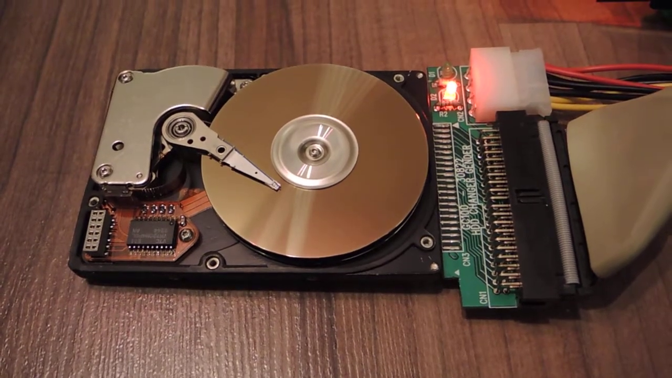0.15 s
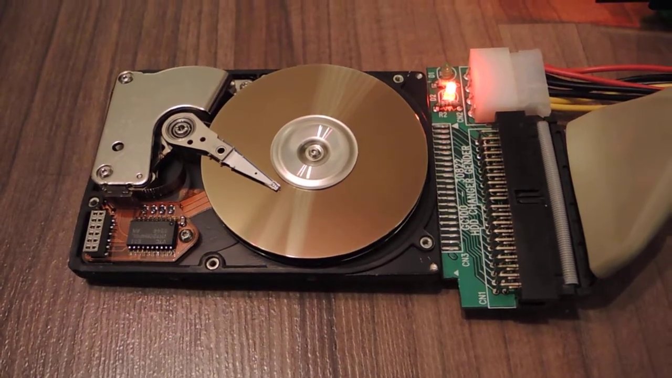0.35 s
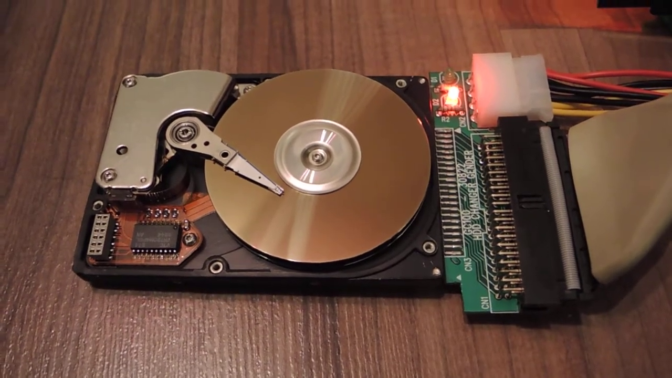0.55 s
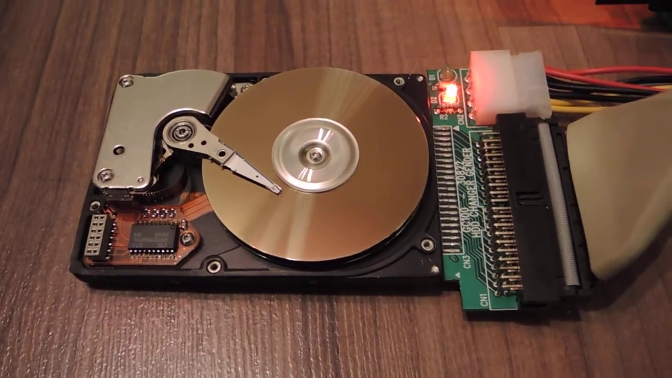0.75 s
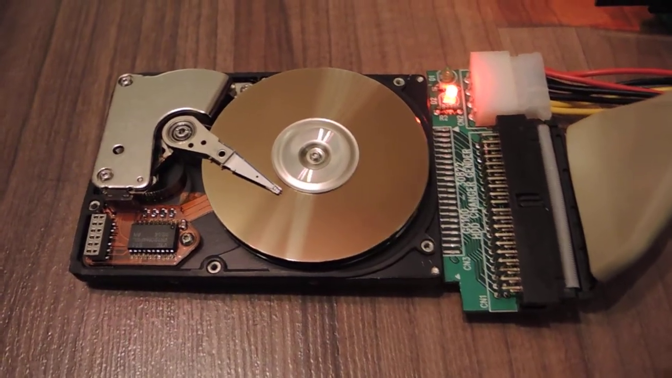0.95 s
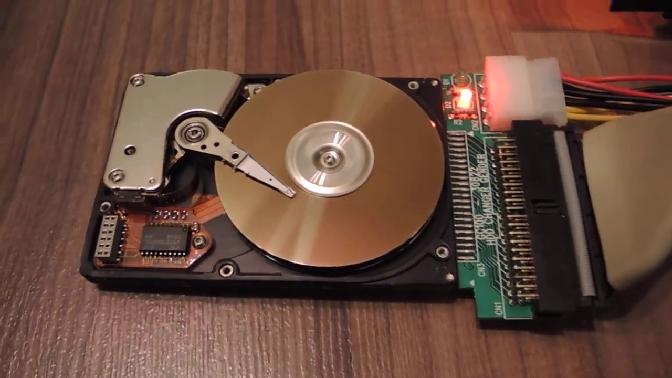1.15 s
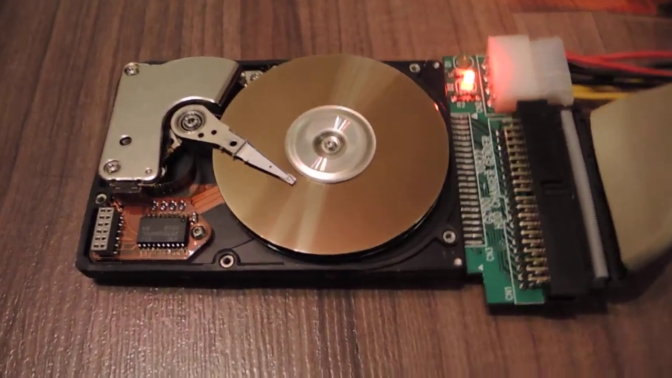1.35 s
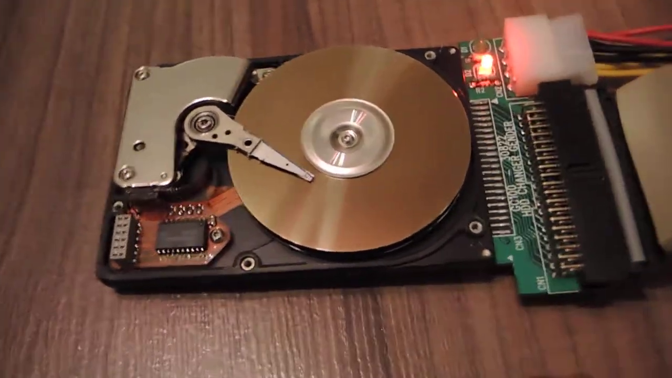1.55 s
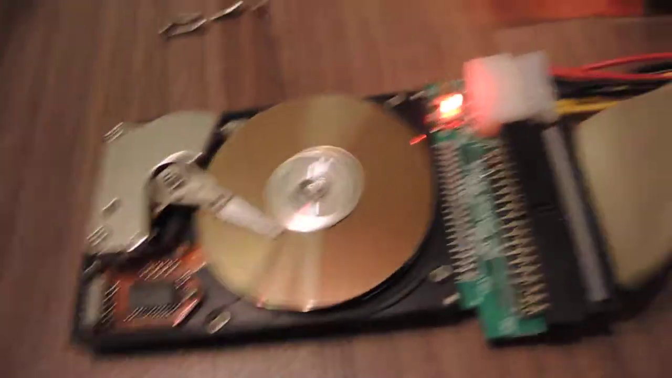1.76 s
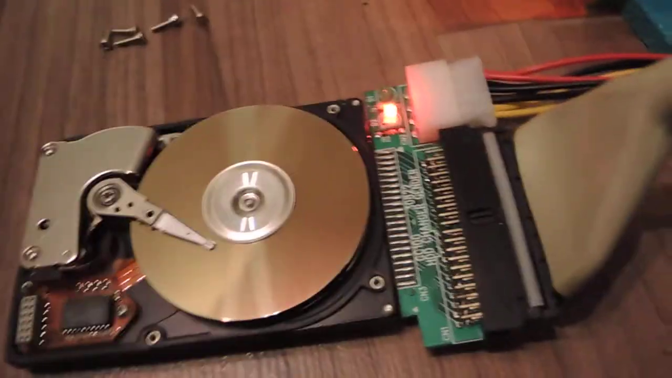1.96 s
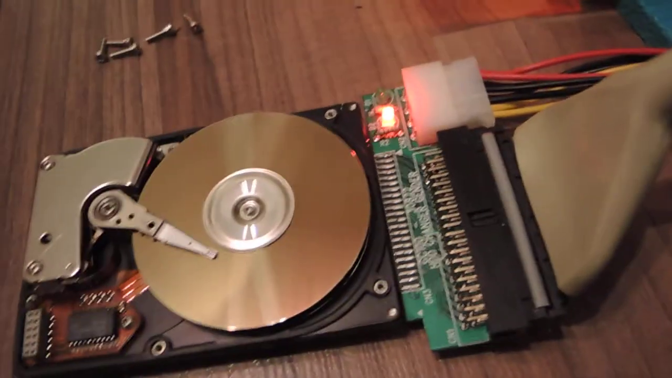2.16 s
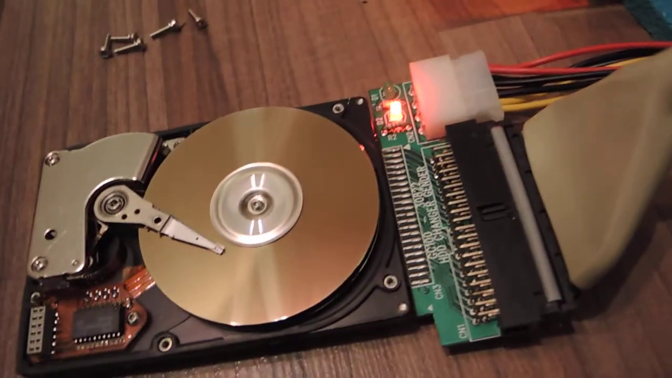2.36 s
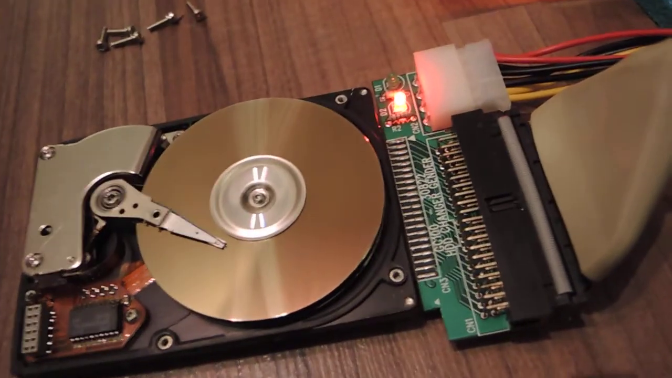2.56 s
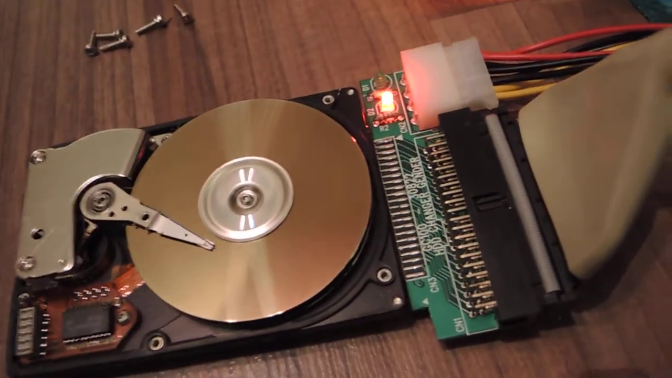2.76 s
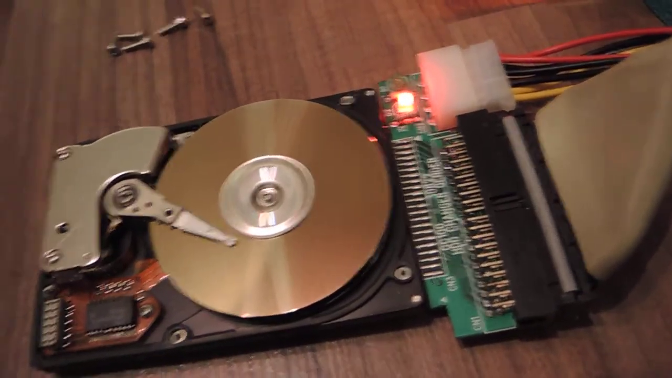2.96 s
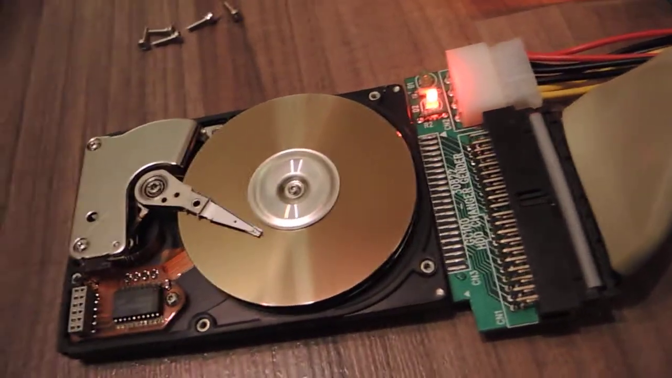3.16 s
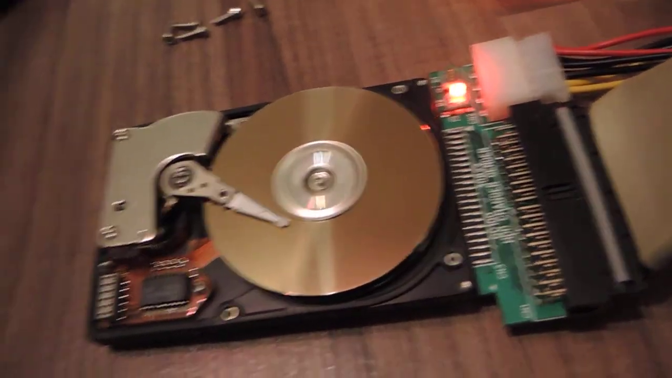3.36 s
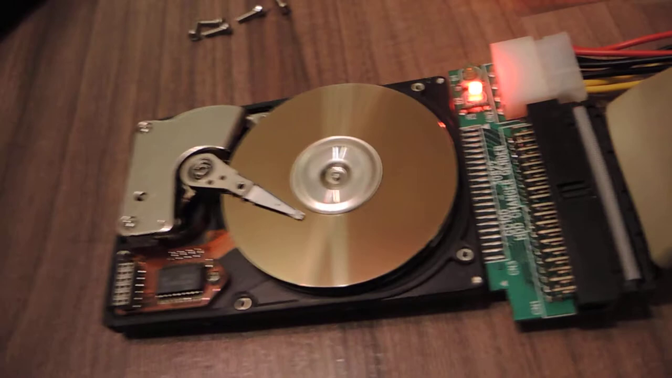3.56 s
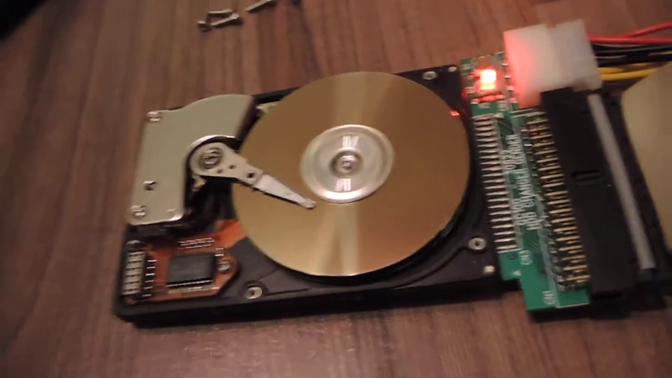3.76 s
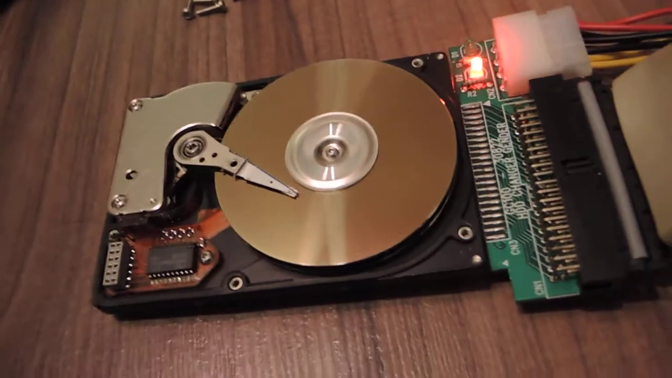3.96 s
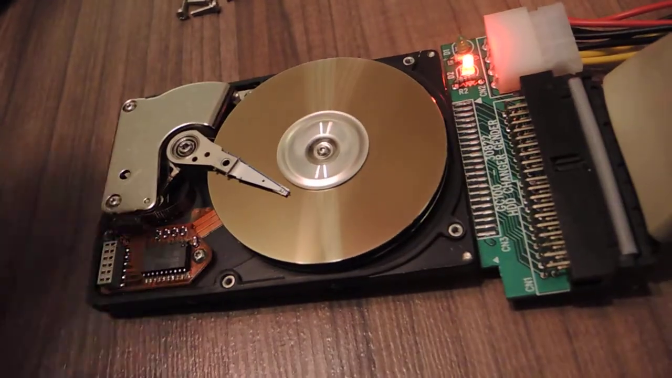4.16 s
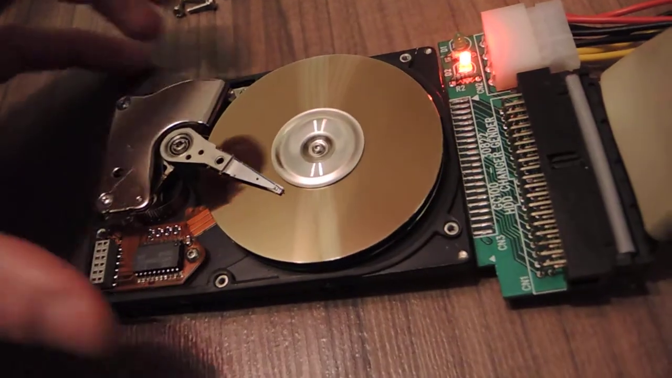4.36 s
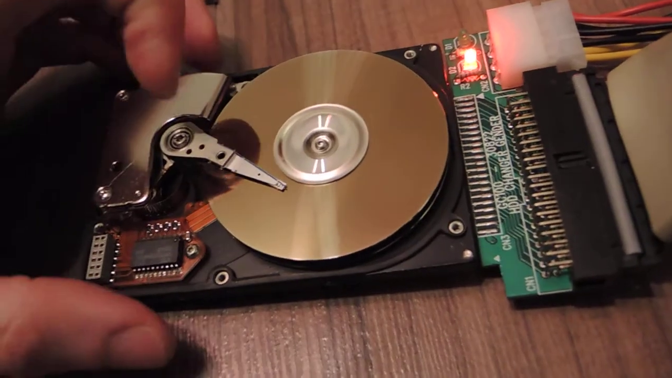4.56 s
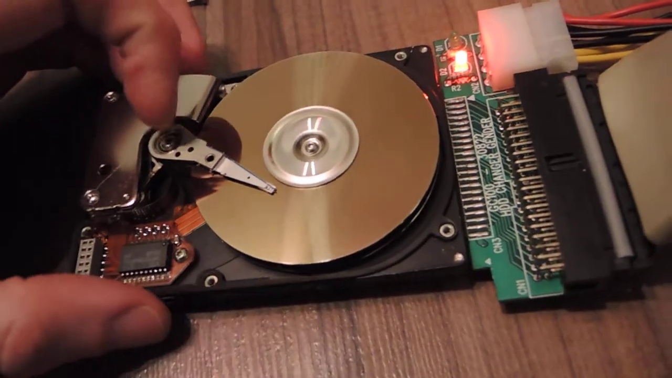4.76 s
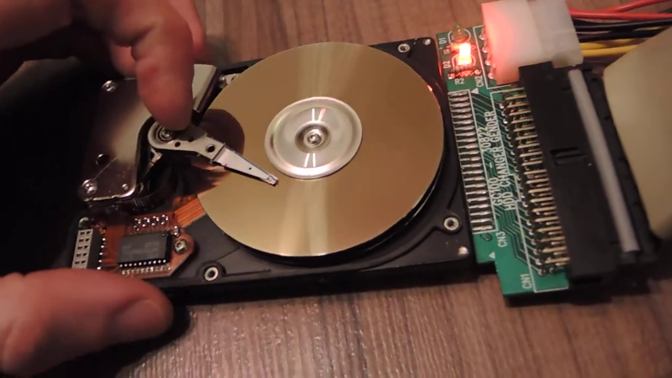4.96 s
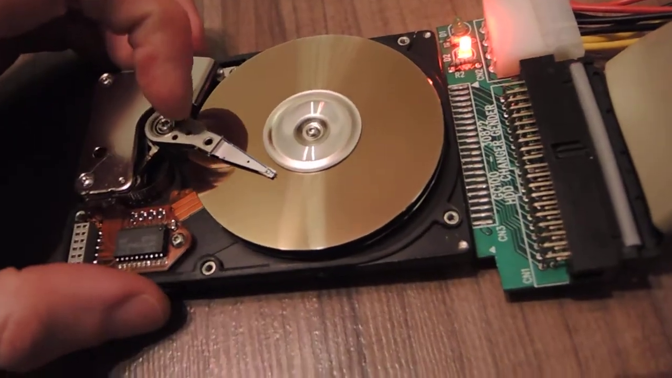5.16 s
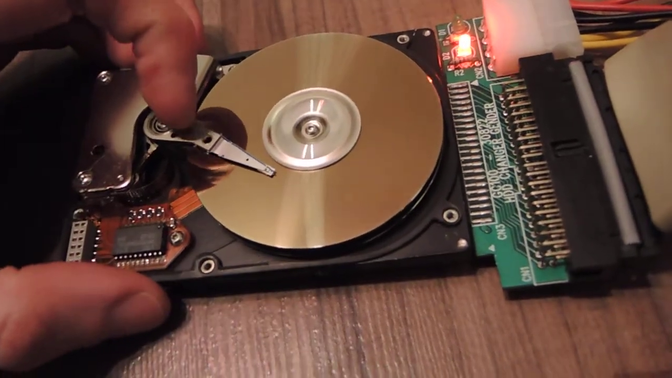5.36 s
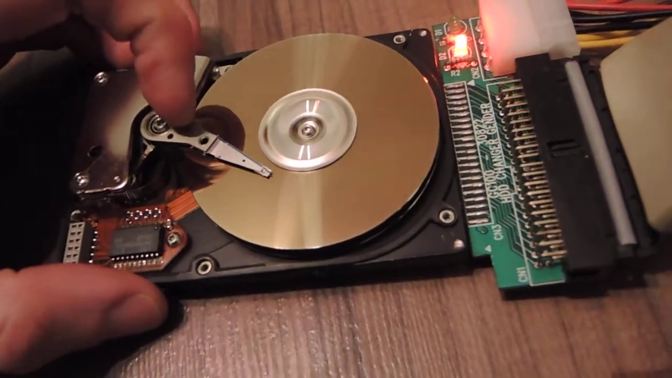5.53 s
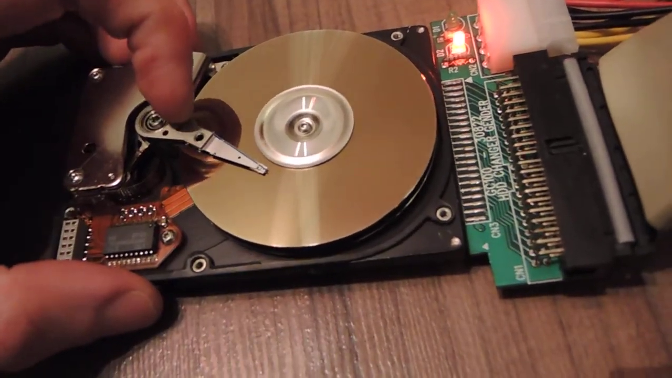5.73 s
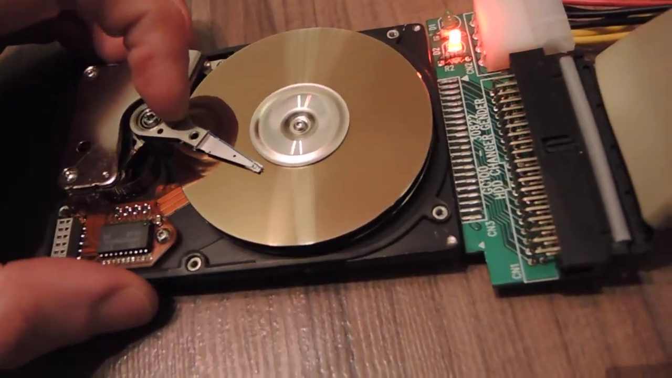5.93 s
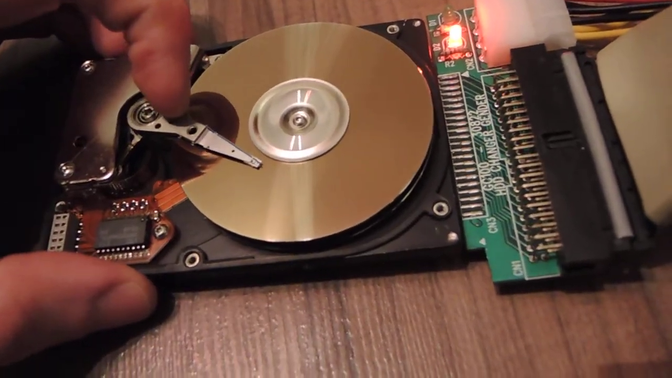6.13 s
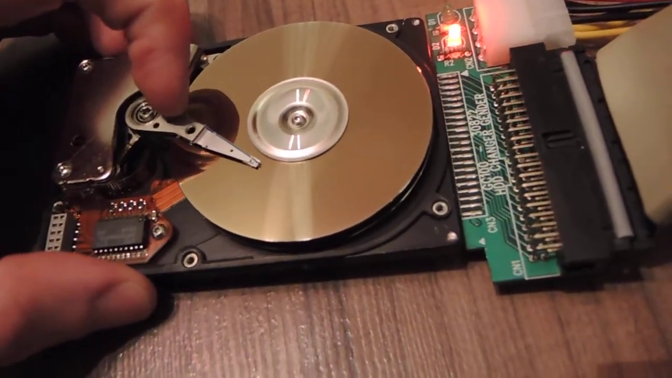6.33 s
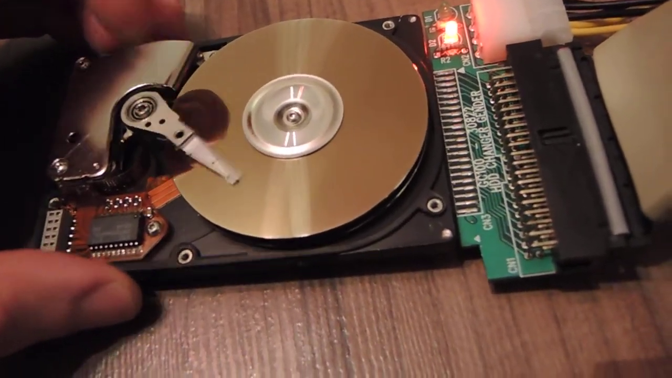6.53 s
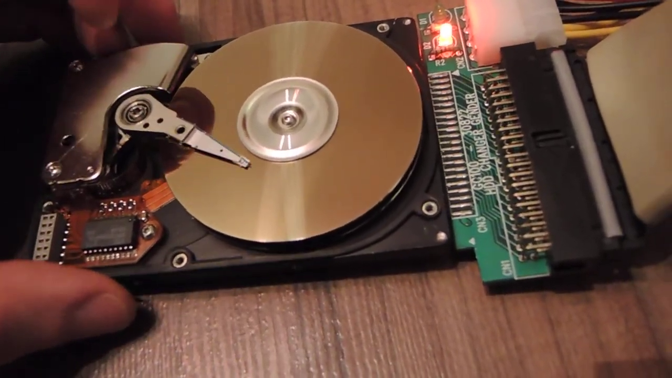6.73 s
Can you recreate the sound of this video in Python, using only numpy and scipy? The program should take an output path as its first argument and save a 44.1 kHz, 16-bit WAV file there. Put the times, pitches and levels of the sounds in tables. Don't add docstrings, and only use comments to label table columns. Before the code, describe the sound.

An opened hard drive spins on a wooden desk, heard very close in stereo in a small, quiet room. From 0 s there is steady airy hiss with faint whistling, thin fixed motor and bearing whines, a buzzing edge that dips around 0.6 s, and dull low room hum. Tiny case ticks come at 0.7 and 1.0 s. At 1.1 s the actuator starts a dry, bright chatter of paired ticks, thirty pairs a second, becoming less sharp, with small knocks at 1.6 and 2.15 s; it stops abruptly at 3.2 s. The buzz, which faded near 2 s, returns softly around 3.4 s. Clacks at 3.55 s and a harder, duller knock at 3.73 s follow, with low handling rumble. Steady spinning continues until 6.45 s, when the arm's latch releases in loud, crackling, slightly overloaded snaps, then metallic hits at 6.59 and 6.66 s and quick shrinking bounces until 6.7 s.

```python
import sys
import numpy as np
from scipy import signal
from scipy.fft import rfft, irfft, next_fast_len
from scipy.io import wavfile

SR = 44100
rng = np.random.default_rng(int(sys.argv[2]) if len(sys.argv) > 2 else 0)


def how_loud(loudness_db):
    steps = np.asarray(loudness_db, float) / 20
    return 10 ** steps


def materialize(psi):
    bounded = np.clip(np.atleast_2d(psi).T, -1, 1)
    quanta = np.round(bounded * 32767).astype(np.int16)
    wavfile.write(sys.argv[1], SR, quanta)


N = 299439

STEP_START_S, STEP_HZ, STEP_COUNT = 1.09175, 30.074, 65


def in_time(rows, s=None):
    at, *columns = np.transpose(rows)
    when = np.arange(N) / SR if s is None else s
    return [np.interp(when, at, column) for column in columns]


def at_hz(points, hz):
    table_hz, db = np.transpose(points)
    return np.interp(np.log(hz), np.log(np.maximum(table_hz, 1)), db)


def rms_one(x):
    return x / np.sqrt(np.mean(x ** 2) + 1e-20)


def drift(rate):
    r = np.exp(-80 * np.pi * rate / SR)
    slow = signal.lfilter([1], [1, -2 * r, r * r], rng.standard_normal(N // 40 + 2002))[2000:]
    return np.interp(np.arange(N) / 40, np.arange(len(slow)), rms_one(slow))


def ring(clicks, hz, t60):
    r, w = how_loud(-60 / (t60 * SR)), 2 * np.pi * hz / SR
    return signal.lfilter([0, np.sin(w)], [1, -2 * r * np.cos(w), r * r], clicks + 1e-18)


def body(x, peaks):
    out = 0
    for k, (hz, width, db) in enumerate(peaks):
        r = np.exp(-np.pi * width / SR)
        b = (1 - r * r) / 2 * np.array([1, 0, -1])
        a = [1, -2 * r * np.cos(2 * np.pi * hz / SR), r * r]
        out = out + (-1) ** k * how_loud(db) * signal.lfilter(b, a, x)
    return out


def pair(x, left_db=0, lead_s=.00002):
    size = next_fast_len(len(x))
    lag = np.exp(-2j * np.pi * np.fft.rfftfreq(size, 1 / SR) * lead_s)
    late = irfft(rfft(x, size) * lag, size)[:len(x)]
    return np.array([x * how_loud(left_db / 2), late * how_loud(-left_db / 2)])


def clicks_at(s, strength):
    out, at = np.zeros((1, N)), s[:, None] * SR
    near = np.round(at).astype(int) + np.arange(-8, 9)
    window = np.cos(np.pi * (near - at) / 17) ** 2
    np.add.at(out[0], near, strength[:, None] * np.sinc(near - at) * window)
    return out


def air_noise(spectrum, patchy_db, flicker):
    # frequency in Hz, left-right likeness from 0 to 1.
    likeness = [(60, 0.64), (130, 0.9), (290, 0.98), (630, 0.97), (1390, 0.89), (3060, 0.84), (6710, 0.57),
                (14700, 0.69)]
    # frequency in Hz, left minus right in dB.
    balance = [(60, 1), (110, -1), (200, -1.0), (380, -1.5), (690, -1), (1280, -0.5), (2350, -4.5),
               (4330, -0.5), (7990, 5), (14700, -4)]
    size = next_fast_len(N)
    hz = np.maximum(np.fft.rfftfreq(size, 1 / SR), 1)
    alike = np.clip(at_hz(likeness, hz), 0, 1)
    mid, side = rfft(rng.standard_normal((2, size))) * how_loud(at_hz(spectrum, hz))
    both = np.sqrt(1 + alike) * mid + np.sqrt(1 - alike) * side * [[1], [-1]]
    both = both * how_loud(at_hz(balance, hz) * [[.5], [-.5]])
    out, together = 0, drift(2.6)
    for centre in np.arange(np.log2(spectrum[0][0]), np.log2(spectrum[-1][0]), .5):
        share = np.clip(1 - 2 * abs(np.log2(hz) - centre), 0, 1)
        level_db = patchy_db * (0.31 * together + drift(flicker))
        out = out + irfft(both * share, size)[:, :N] * how_loud(level_db)
    return rms_one(out)


def turning(count):
    turn_hz, first, end = 62.09, 100, 232
    lines = np.zeros((count, 2049), complex)
    phase = 2 * np.pi * rng.random((count, end - first))
    lines[:, first:end] = how_loud(rng.normal(0, 4.9, end - first)) * np.exp(1j * phase)
    angle = (np.arange(N) / SR * turn_hz) % 1 * 4096
    turns = [np.interp(angle, np.arange(4096), turn, period=4096) for turn in irfft(lines)]
    return rms_one(np.array(turns))


def hiss():
    # frequency in Hz, hiss density in dB per Hz.
    hiss_spectrum = [(470, -14), (800, -7.5), (1320, -7), (1490, 2.5), (2010, 0.5), (2170, 1.5), (2360, 0),
                     (3840, 1.5), (4400, 3.5), (5220, -1.5), (6850, -5), (9530, -8.5), (12100, 0.5),
                     (15700, -60), (22000, -120)]
    # time in seconds, hiss level in dB.
    nearness = [(0, -34), (.3, -33.5), (.5, -36), (.66, -33.5), (1.6, -33), (3.2, -34), (3.45, -35),
                (6.79, -35)]
    hiss_db, = in_time(nearness)
    rush = how_loud(hiss_db - 3.0) * air_noise(hiss_spectrum, patchy_db=2.0, flicker=17.0)
    return rush + how_loud(hiss_db - 6.0) * whistles()


def whistles():
    # frequency in Hz, width in Hz, level in dB.
    cavities = [(928, 19, 15), (2700, 180, -11.5), (3480, 80, -24), (4600, 280, -1), (6850, 67, -10),
                (7720, 1380, 6), (11000, 370, 7.5), (11860, 175, 9)]
    shared, *apart = rng.standard_normal((3, N)) + how_loud(-5) * turning(count=3)
    wind = pair(shared) + .5 * np.array(apart)
    return rms_one(body(wind, cavities)) * how_loud(drift(0.91))


def tones():
    # frequency in Hz, rms level in dB.
    tone_lines = [(473.7, -50), (1077, -54), (1486, -52), (2156, -50), (2692, -52), (3305, -59), (3370, -52),
                  (3639, -52), (4011, -55), (4247, -57), (4307, -54), (4490, -52), (4721, -56), (5469, -61),
                  (5615, -61), (6735, -51), (7316, -57), (7860, -58), (8382, -59),
                  (7431, -59), (8985, -60), (10104, -62), (10691, -61), (11768, -59)]
    t, out = np.arange(N) / SR, 0
    for hz, db in tone_lines:
        phase = 2 * np.pi * (hz * t + rng.random()) + 0.42 * drift(1.5)
        apart = rng.normal(0, 0.46) * hz / 5000 * np.array([[1], [-1]])
        waver_db = 1.6 * drift(5.0)
        out = out + np.sqrt(2) * how_loud(db + 1.2 + waver_db) * np.sin(phase + apart)
    return out


def buzz():
    # time in seconds, buzz level in dB.
    motor_load = [(0, -38.5), (.4, -38.5), (.58, -49), (.75, -39.5), (1.15, -44), (1.5, -35), (1.65, -39),
                  (1.95, -68), (3.1, -60), (3.4, -45.5), (5.0, -45), (6.79, -44.5)]
    # frequency in Hz, width in Hz, level in dB.
    chassis = [(1450, 460, -11), (2480, 89, 1), (3410, 180, -6.5), (3967, 70, -2), (4520, 270, -3),
               (7436, 100, 2.5)]
    buzz_hz = 235.85
    pulses = np.zeros(N)
    at = np.arange(0, N - 1, SR / buzz_hz).astype(int)
    pulses[at] = how_loud(rng.normal(0, 0.34, len(at)))
    buzz_db, = in_time(motor_load)
    return pair(how_loud(buzz_db + 0.66 * drift(29.0)) * rms_one(body(pulses, chassis)), -0.54)


def sizzle():
    resting_db, stepping_db = -59, -75
    t = np.arange(N) / SR
    stepping = (t > STEP_START_S) & (t < STEP_START_S + STEP_COUNT / STEP_HZ)
    air = rng.standard_normal((2, N)) + .7 * turning(count=2)
    band = signal.sosfilt(signal.butter(4, (13500, 14150), "band", fs=SR, output="sos"), air)
    return how_loud(np.where(stepping, stepping_db, resting_db)) * rms_one(band)


def stepper():
    # time in seconds, level in dB.
    force = [(1.08, -17.5), (1.2, -17.5), (1.55, -15), (1.8, -15), (3.22, -16)]
    # frequency in Hz, level in dB, t60 in seconds,
    # left minus right in dB.
    housing = [
        [(8700, 5.5, .0032, 0), (7250, -7, .008, 1), (7900, -4, .004, 0), (6500, -14, .005, 1),
         (9500, -11, .002, 0), (13500, -22, .001, 0)],
        [(4150, -2, .010, -2), (4700, -6.5, .008, -1), (3650, -9, .008, -3), (3150, -12, .010, -4),
         (5250, -8, .006, 0), (5800, -11, .004, 0)],
        [(2570, -6, .016, -4), (930, -21, .03, 0), (1530, -20, .04, 0), (1440, -16, .075, -1),
         (1250, -25, .02, 0), (1750, -25, .02, 0)],
    ]
    arrivals_s, rises_s = (.00005, .0003, .0007), (.0001, .0002, .0008)
    return_s, echo_s, echo_db, jitter_s = .0095, .0019, -12.0, .000006
    steps = STEP_START_S + np.arange(STEP_COUNT) / STEP_HZ
    step_db, = in_time(force, steps)
    treble_db = np.maximum(7 - 7 * (steps - STEP_START_S), 0.5)
    treble_db[-1] = 5
    return_db = step_db + np.linspace(-8, -3.5, STEP_COUNT)
    s = np.r_[steps, steps[:-1] + return_s]
    db = np.r_[step_db, return_db[:-1]]
    s = s + rng.normal(0, jitter_s, len(s))
    pull = np.r_[np.ones(STEP_COUNT), -np.ones(STEP_COUNT - 1)]
    extra_db = np.r_[treble_db, treble_db[:-1] + 1.5], 0, 0
    out, t = 0, np.arange(int(.06 * SR)) / SR
    for modes, arrival, rise, more_db in zip(housing, arrivals_s, rises_s, extra_db):
        shape = 0
        for k, (hz, mode_db, t60, left_db) in enumerate(modes):
            fading_db = mode_db - 60 * t / t60 + np.array([[.5], [-.5]]) * left_db
            shape = shape + (-1) ** k * how_loud(fading_db) * np.sin(2 * np.pi * hz * t)
        strength = how_loud(db + more_db + rng.normal(0, .9, len(s))) * pull
        clicks = clicks_at(s + arrival, strength)
        clicks -= clicks_at(s + arrival + echo_s, how_loud(echo_db) * strength)
        out = out + signal.fftconvolve(clicks, shape * (1 - np.exp(-t / rise)), axes=1)[:, :N]
    return np.array([out[0], pair(out[1])[1]])


def blows(events, groups, gain_db, low_db, own):
    out, t = np.zeros((2, N)), np.arange(int(.15 * SR)) / SR
    for s, peak_db, treble_db, t60 in events:
        shared, *apart = rng.standard_normal((3, len(t)))
        rattle = (pair(shared) + own * np.array(apart)) * np.minimum(t / 0.0001, 1)
        sound = 0
        for peaks, db, share in zip(groups, (low_db, 0, treble_db), (1, 1, 0.78)):
            rung = body(rattle * how_loud(-60 * t / (t60 * share)), peaks)
            sound = sound + how_loud(db) * rung / abs(rung).max()
        at = round(s * SR)
        out[:, at:at + len(t)] += (how_loud(peak_db + gain_db) * sound / abs(sound).max())[:, :N - at]
    return out


def head_arm():
    # start in seconds, peak in dB, treble over middle in dB, t60 in seconds.
    snaps = [
        (6.4436, -9, 1, 0.024),
        (6.4536, 12.5, 13.4, 0.012),
        (6.4662, 7, 6.3, 0.014),
        (6.4728, -3, 9.7, 0.024),
        (6.4768, 0.5, 9.5, 0.0059),
    ]
    # frequency in Hz, width in Hz, level in dB.
    latch = [
        [(587, 560, -36), (1130, 300, -16.5), (1910, 1300, -19.5), (2740, 140, -0.5), (2686, 15, -4)],
        [(3700, 490, -3), (4330, 16, -2), (4260, 540, -8), (4900, 340, 6), (4950, 21, -8)],
        [(5900, 2000, -10.5), (7250, 490, -1.5), (8730, 740, -4.5), (9540, 420, -1), (10360, 380, -5.5),
         (11700, 1500, -25)],
    ]
    # start in seconds, peak in dB, treble over middle in dB, t60 in seconds.
    bounces = [
        (6.5866, 2.5, 2.3, 0.019),
        (6.6591, 2, 3, 0.0095),
        (6.6887, -3, 5.4, 0.017),
        (6.6967, -4.5, .6, 0.016),
        (6.7016, -7.5, 0.1, 0.029),
        (6.7072, -11, 18, 0.009),
    ]
    # frequency in Hz, width in Hz, level in dB.
    arm_body = [
        [(1180, 210, -11), (1710, 106, -6.5), (2340, 290, -3), (2790, 170, -1)],
        [(3580, 310, -2), (4180, 1070, -6), (4790, 184, 7), (4770, 34, -13)],
        [(5900, 1600, -27), (7100, 280, -2.5), (8830, 350, 3), (10230, 890, -6.5), (11800, 1700, -14)],
    ]
    release = blows(snaps, latch, gain_db=5.5, low_db=-4.5, own=0.5)
    return release + blows(bounces, arm_body, gain_db=2.5, low_db=-4.0, own=0.23)


def case_knocks():
    # start in seconds, peak in dB, treble over middle in dB, t60 in seconds.
    light = [(0.7444, -25, 16, 0.012), (0.9812, -15, 10, 0.015), (1.0283, -19.5, 22, 0.012),
             (1.0344, -23, 12, 0.010), (1.6128, -16.5, 6, 0.032), (2.1404, -32, 7, 0.012),
             (2.149, -13.5, 2.5, 0.024), (3.6074, -25, 1, 0.016), (3.6174, -34, 3, 0.012)]
    # frequency in Hz, width in Hz, level in dB.
    case = [
        [(1220, 540, -8), (1760, 410, -20.5), (2440, 174, -1)],
        [(3560, 500, -12), (3820, 280, 16), (5340, 1500, 7)],
        [(6100, 410, 3), (6960, 230, 12), (8330, 970, 11), (11600, 1700, 4)],
    ]
    # start in seconds, peak in dB, treble over middle in dB, t60 in seconds.
    hard = [
        (3.5452, -13.5, 5.5, 0.016),
        (3.5725, -13.5, 11, 0.02),
        (3.7282, -4.5, -7, 0.016),
        (3.7308, -13, 11, .016),
    ]
    # frequency in Hz, width in Hz, level in dB.
    clack_body = [
        [(735, 150, -12), (1330, 640, -7), (1867, 16, 5), (2340, 170, 3)],
        [(3240, 170, 0), (4040, 480, -7.5), (4980, 300, 0.5)],
        [(6100, 78, 4), (7000, 820, 0), (8600, 2300, -4), (11300, 1300, -3.5)],
    ]
    creaks = blows(light, case, gain_db=4.5, low_db=-2.0, own=0.47)
    return creaks + blows(hard, clack_body, gain_db=2.5, low_db=-4.0, own=0.51)


def thuds():
    # start in seconds, level in dB, frequency in Hz, t60 in seconds.
    answers = [(3.545, -16, 330, .045), (3.572, -16, 310, .05), (3.549, -25, 1000, .03),
               (3.576, -26, 750, .025), (3.619, -28, 1050, .02), (3.728, -24, 420, .025),
               (3.730, -21, 1900, .06), (3.730, -24, 6300, .035), (3.553, -28, 1200, .02),
               (1.613, -22, 3830, .02), (6.455, -27, 340, .05), (6.587, -26, 500, .02),
               (6.5872, -7, 4925, .035), (6.6597, -10, 4925, .035), (3.546, -20, 6000, .006)]
    out = np.zeros(N)
    for s, db, hz, t60 in answers:
        at = round(s * SR)
        out[at:at + 4000] += ring(how_loud(db) * (np.arange(4000) == 0), hz, t60)
    return pair(out, -2.8)


def room(x):
    t60_s, wall_cut_hz = .25, 7000
    t = np.arange(int(.4 * SR)) / SR
    tail = rng.standard_normal((2, len(t))) * how_loud(-60 * t / t60_s) * (t > .004)
    tail = signal.sosfilt(signal.butter(1, wall_cut_hz, fs=SR, output="sos"), tail)
    tail = tail / np.sqrt((tail ** 2).sum(1, keepdims=True))
    return signal.fftconvolve(x, tail, axes=1)[:, :N]


def handling():
    # time in seconds, peak in dB.
    grips = [(.49, -53), (.74, -53), (.98, -53), (1.32, -56), (1.66, -49), (2.15, -52), (2.52, -58),
             (2.78, -54), (3.19, -48), (3.56, -48), (3.74, -49.5), (4.73, -54), (4.98, -53), (6.03, -55)]
    floor_db, swell_db_per_s, fade_db_per_s = -59.5, 65, 120
    t, level_db = np.arange(N) / SR, floor_db
    for s, db in grips:
        slope = np.where(t < s, swell_db_per_s, fade_db_per_s)
        level_db = np.maximum(level_db, db - slope * abs(t - s))
    rumble_spectrum = [(20, -16), (45, -8), (70, 0), (110, -5.5), (140, 8)]   # Hz, dB per Hz
    return how_loud(level_db) * air_noise(rumble_spectrum, patchy_db=3.5, flicker=6.8)


def room_hum():
    # frequency in Hz, density in dB per Hz.
    hum_spectrum = [(59, -40), (100, -19), (200, -6), (238, -8.5), (318, 0), (397, -3), (472, -5),
                    (624, -4.5), (891, -16), (917, -9), (1000, -14.5), (1300, -18), (2200, -120)]
    return how_loud(-38) * air_noise(hum_spectrum, patchy_db=1.0, flicker=1.6)


def scene():
    drive = hiss() + tones() + buzz()
    air_top = signal.cheby1(10, 1, 11900, fs=SR, output="sos")
    drive = signal.sosfilt(air_top, drive) + sizzle()
    arm, knocks = head_arm(), case_knocks()
    hits = knocks + arm + thuds() + stepper()
    hits = hits + how_loud(-26) * room(pair(knocks[0])) + how_loud(-19) * room(arm)
    no_deep_bass = signal.butter(2, 170, "high", fs=SR, output="sos")
    return room_hum() + handling() + drive + signal.sosfilt(no_deep_bass, hits)


def roll_off(x):
    return signal.sosfilt(signal.butter(12, 15320, fs=SR, output="sos"), x)


def record(dry):
    bass_block = signal.butter(1, 30, "high", fs=SR, output="sos")
    mix = signal.sosfilt(bass_block, np.clip(dry, -1, 1))
    return roll_off(mix)


dry = scene()
out = record(dry)
materialize(out)
```